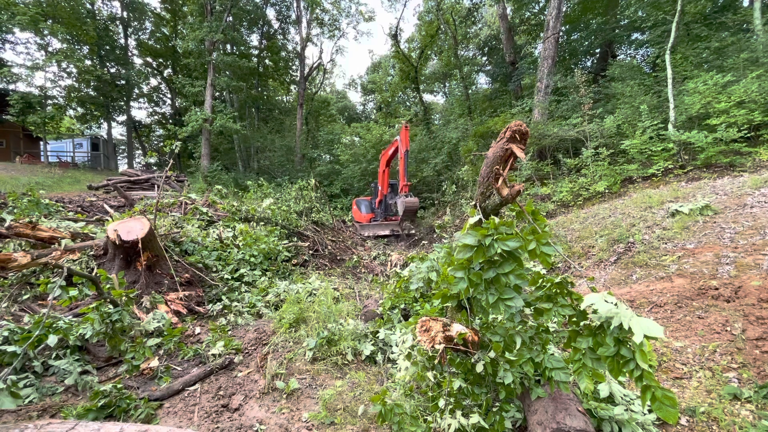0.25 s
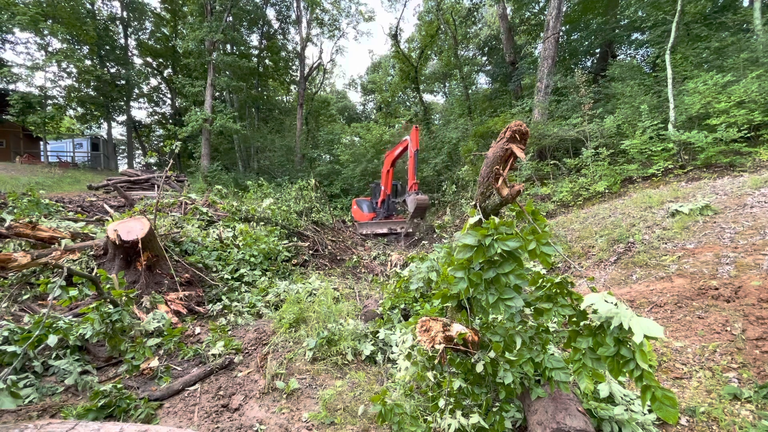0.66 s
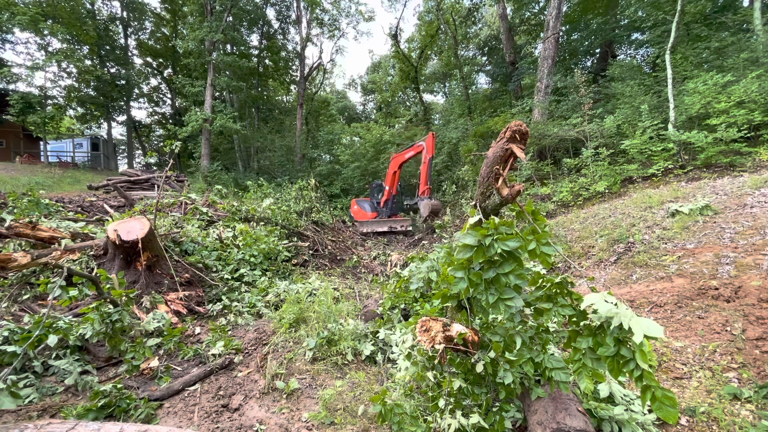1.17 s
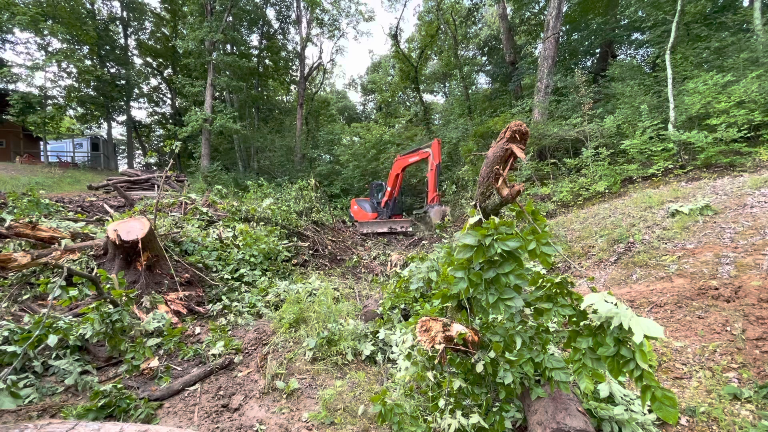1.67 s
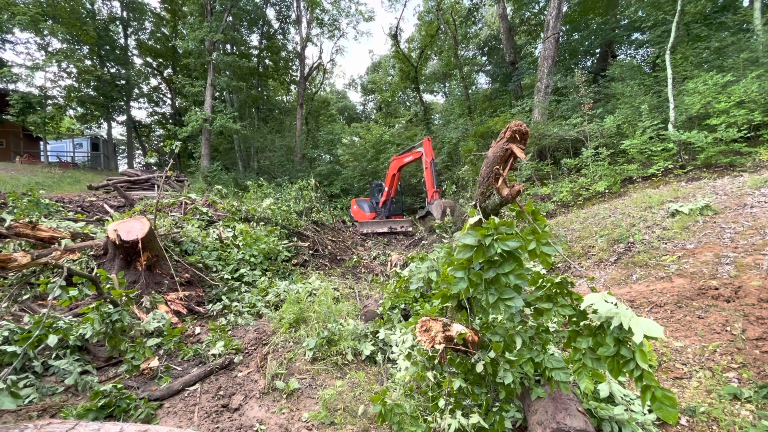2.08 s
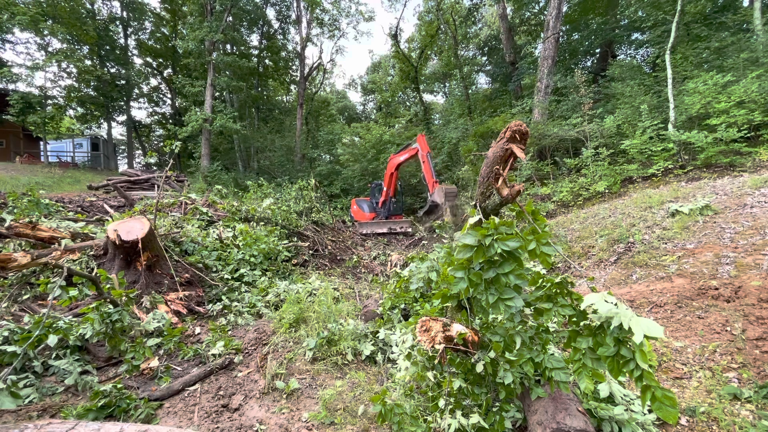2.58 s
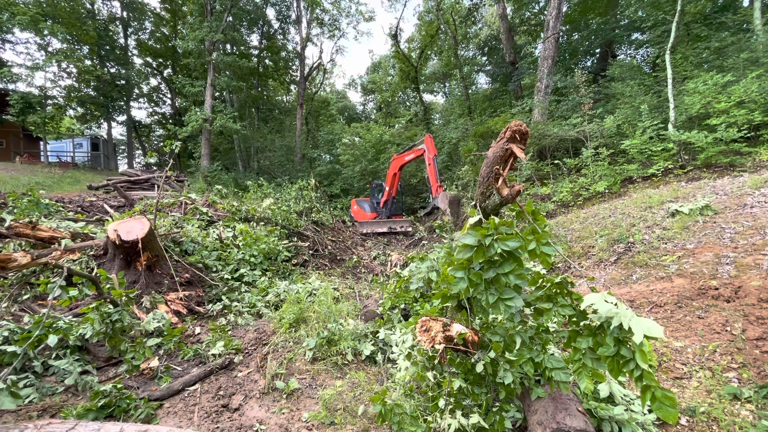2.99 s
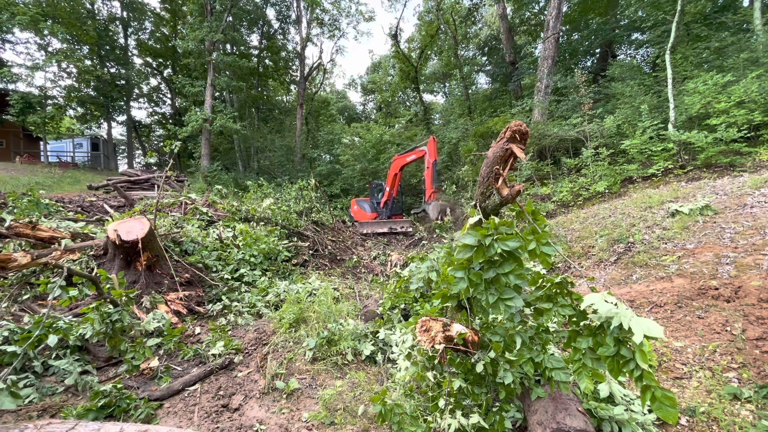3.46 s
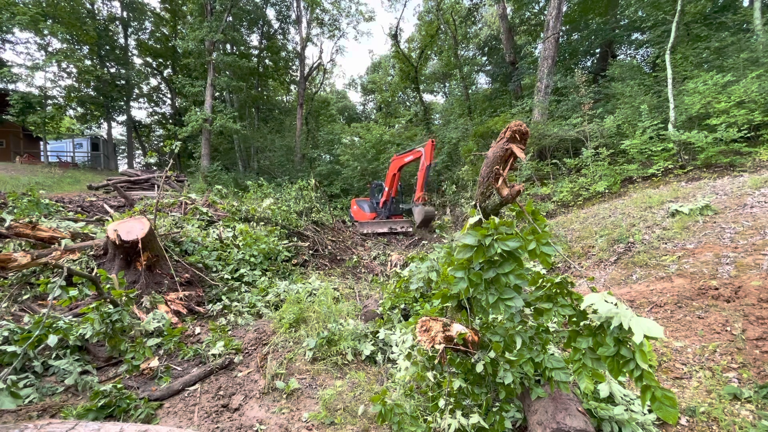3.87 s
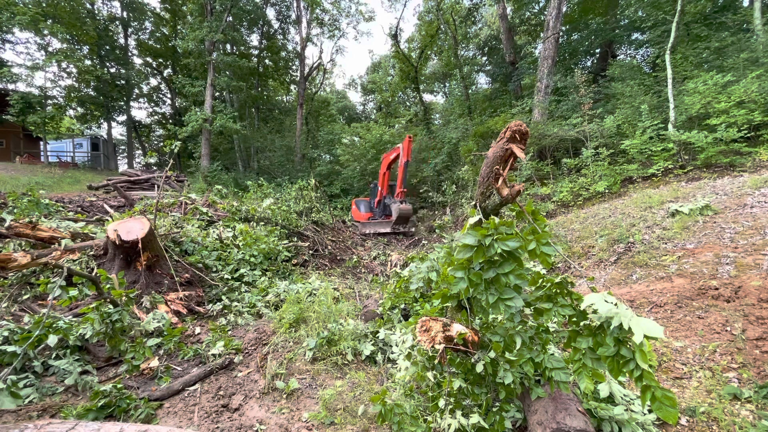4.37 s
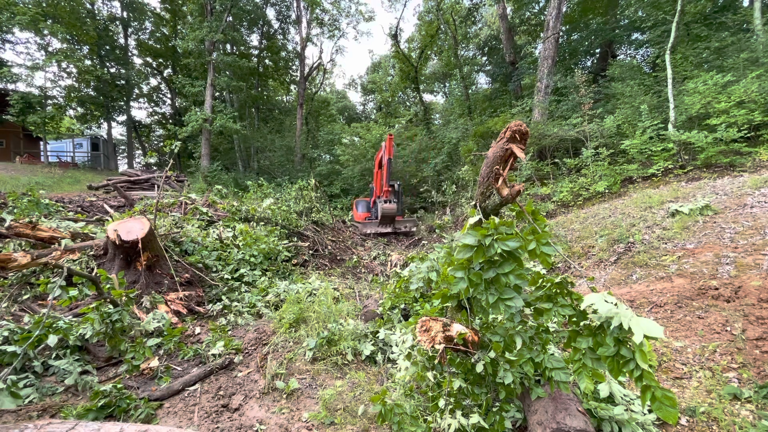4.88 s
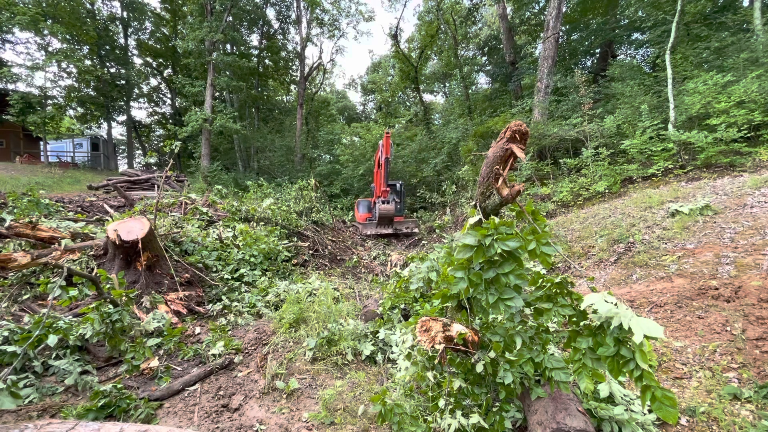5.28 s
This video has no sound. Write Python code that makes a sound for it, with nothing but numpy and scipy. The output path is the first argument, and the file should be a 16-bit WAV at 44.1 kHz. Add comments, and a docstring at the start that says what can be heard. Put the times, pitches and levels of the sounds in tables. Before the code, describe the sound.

Repeated short metal clanks and thuds sound over the steady diesel drone of a small excavator working outdoors among felled trees.

```python
"""A diesel exhaust hums over a low rumble: a small excavator works among felled trees some way off.
The hum is a few multiples of the firing rate, sagging under load; engine and tracks roar beneath it.
Tracks and bucket clank on stones, each blow a short grind that rings steel and thuds into the soil.
Close by, leaves hiss and dry twigs snap; past halfway the hydraulics whine faintly.
Trunks and slope scatter the clanks and snaps into a short tail."""
import sys
import numpy as np
from scipy import signal
from scipy.fft import rfft, irfft
from scipy.io import wavfile
from scipy.ndimage import uniform_filter1d

SR = 44100
rng = np.random.default_rng(int(sys.argv[2]) if len(sys.argv) > 2 else 0)


def dump_mix(stems):
    """Bounce the given channels to the path in sys.argv[1] as a 16-bit WAV at rate SR."""
    frames = np.atleast_2d(stems).T  # one column per channel
    limited = np.clip(frames, -1, 1)  # hard clip at full scale
    pcm = np.round(limited * 32767).astype(np.int16)
    wavfile.write(sys.argv[1], SR, pcm)


N = 244314
TIME = np.arange(N) / SR

# engine speed, sagging under load: t/s, firing rate/Hz
FIRING_RATE = [(0, 68.5), (.55, 68.2), (1.0, 69.0), (1.4, 70.4), (1.7, 69.7), (2.2, 68.5), (2.7, 69.0),
               (3.5, 68.6), (3.9, 67.4), (4.7, 67.6), (5.54, 68.0)]
# exhaust tones, low hum and pipe: multiple of the firing rate, base level/dB, waver/dB
HUM_TONES = [(1, -36, 1), (2, -33.5, 2.5), (3, -51, -1)]
PIPE_TONES = [(5, -43.5, 3.5), (6, -59.5, 2.4)]
# exhaust tones coming and going: t/s, hum gain/dB, pipe gain/dB
EXHAUST_SWELLS = [(0, 2.5, 1), (.25, -7, -3), (.45, -1, -1), (.75, -1.5, -12), (1.25, -8.5, -4),
                  (1.45, 0, -3), (1.57, -8, 11), (1.7, -5.5, 0), (1.82, -0.5, 4), (1.95, -1.5, -0.5),
                  (2.15, -2.5, 6), (2.6, -0.5, 0.5), (3.0, -6.5, 2), (3.3, -3, 0), (3.7, -1.5, -4.5),
                  (3.8, 1, 8.5), (3.9, 1, 14.5), (4.0, -1, -2), (4.1, -5, -1), (4.35, -1.5, -28),
                  (4.7, -4, 2), (5.3, -4.5, 6), (5.54, 2, 3)]
# levels of the machine's roar and drone, and of an unevenly drifting low rumble:
# t/s, roar level/dB, drone level/dB, rumble level/dB
BED_LEVELS = [(0, -36.5, -31.5, -37), (.26, -33, -32.5, -36), (.66, -37.5, -36.5, -39),
              (1.05, -36.5, -35.5, -32.5), (1.25, -44.5, -52, -38.5), (1.6, -38.5, -39.5, -38),
              (1.8, -33, -36, -42), (1.95, -41, -45, -37), (2.3, -40, -39, -38), (2.75, -42.5, -41, -37),
              (3.0, -40.5, -36, -37.5), (3.35, -42.5, -49, -37), (3.7, -37, -35.5, -41),
              (4.0, -39, -48, -34.5), (4.3, -35, -36, -33.5), (4.55, -36, -34.5, -32.5),
              (4.8, -39.5, -32.5, -38.5), (5.2, -34, -33, -30), (5.54, -35, -37, -31)]
# tone colours of low rumble, chassis, engine with tracks, and leaves: f/Hz, relative level/dB
RUMBLE_COLOUR = [(25, -28), (48, 3), (62, -6), (95, 4.5), (120, 1.5), (160, -19), (300, -64)]
DRONE_COLOUR = [(70, -4.5), (120, 2), (160, 2.5), (200, -3.5), (260, -12.5), (330, -6.5), (600, -64)]
ROAR_COLOUR = [(120, -40), (240, -7), (350, 3.5), (500, -2), (680, -6), (1100, -10), (1350, -11.5),
               (1550, -27), (1900, -16), (2600, -23), (4000, -34.5), (6500, -46)]
LEAF_COLOUR = [(2000, 4.5), (4000, -1.5), (5400, -0.5), (6500, -2.5), (8500, -2), (10000, 0.5),
               (11200, 3.5), (11900, -3), (12400, -12), (12800, -41)]
# steady part of the leaf hiss: t/s, level/dB
LEAF_LEVELS = [(0, -48.5), (.2, -51.5), (1.0, -47.5), (2.3, -49), (3.3, -48.5), (4.1, -47), (4.7, -48.5),
               (5.54, -52.5)]
# modes of bucket and tracks: f/Hz, relative level/dB, t60/s (held within RING_LIMITS_S)
STEEL_MODES = [(840, 0.5, 0.0085), (886, -21, 0.033), (1035, 9, 0.013), (1125, 10, 0.039),
               (1283, 7.5, 0.065), (1308, 7, 0.073), (1700, -13, 0.054), (1803, 12, 0.0047),
               (1780, -19, 0.024), (2049, 7, 0.048), (2160, -15, 0.012), (2620, -19, .018),
               (2780, 7, 0.032), (3140, 22, 0.03), (3500, -32, 0.018), (4430, -29, 0.017)]
# blows on stone: t/s, crunch level/dB, ring f/Hz, ring level/dB, thud f/Hz, thud level/dB,
# edge f/Hz, edge level/dB, base grind time/ms
BLOWS = [(0.045, -41, 900, -37, 440, -31, 2500, -55, 12),
         (0.058, -34.5, 820, -31.5, 455, -25, 3070, -45, 20),
         (0.159, -33, 1050, -45, 174, -31.5, 3000, -63, 61),
         (0.194, -52, 930, -29, 207, -26, 3000, -64, 31),
         (0.271, -35, 1790, -28, 190, -49, 2760, -34.5, 12),
         (0.354, -22, 1050, -39, 460, -27.5, 4340, -36.5, 18),
         (0.428, -37.5, 1110, -51, 380, -32, 5000, -49, 19),
         (0.567, -39, 840, -37, 450, -25, 2000, -50, 11.3), (0.63, -43, 1000, -46, 450, -45, 2500, -52, 15),
         (0.655, -40, 1090, -42, 480, -37, 2500, -52, 15),
         (0.672, -33.5, 914, -42, 477, -33.5, 3000, -51, 13),
         (0.802, -35.5, 1240, -41, 180, -51, 3000, -58, 8.7),
         (0.918, -28.5, 1240, -34, 420, -27, 3420, -36, 10),
         (0.938, -36, 1200, -27.5, 546, -27, 3470, -53, 9.5),
         (1.033, -38, 1935, -38.5, 180, -47, 3500, -44, 15.6),
         (1.422, -35, 1220, -36.5, 402, -26, 3000, -63, 19),
         (1.616, -27.5, 1280, -37, 660, -45, 3700, -38, 21.3),
         (1.663, -28.5, 1205, -25, 198.1, -27.5, 2960, -55, 10),
         (1.740, -28, 880, -39, 368, -22.5, 3240, -34, 19),
         (1.853, -61, 1367, -32.5, 360, -31, 3000, -61, 16),
         (1.881, -70, 1250, -34, 183, -29, 3000, -60, 14),
         (1.908, -49, 1192, -39.5, 182, -34.5, 3000, -55, 28),
         (2.185, -45, 1250, -28.5, 535, -32.5, 2600, -33, 10.5),
         (2.5, -46, 1250, -43, 440, -38, 2900, -53, 62), (2.204, -40, 1260, -40, 540, -51, 2520, -49, 7.8),
         (2.384, -50, 1040, -39, 444, -29, 2300, -55, 52),
         (2.445, -33, 1340, -19, 527, -36, 2930, -34, 7.7),
         (2.456, -30.5, 790, -29, 377, -21.5, 2100, -53, 9.8),
         (2.521, -44, 1200, -46, 503, -34.5, 3000, -58, 31),
         (2.664, -53, 1150, -44, 420, -37, 3000, -69, 15),
         (2.714, -53, 1320, -39.5, 370, -27.5, 3000, -69, 23),
         (2.754, -60, 870, -50, 405, -31, 3000, -67, 10), (2.836, -67, 1086, -44, 380, -33, 3000, -67, 29),
         (2.885, -60, 880, -43, 340, -32.5, 2980, -65, 13), (2.96, -64, 870, -58, 368, -34, 3000, -67, 18),
         (2.988, -35.5, 960, -35, 401, -31, 3540, -44, 13),
         (3.424, -36, 3550, -43, 378, -36, 4240, -45.5, 24),
         (3.555, -29.5, 836, -29, 390, -26.5, 3870, -36, 17.4),
         (3.703, -56, 1930, -57, 366, -30, 3050, -57, 5.3),
         (3.766, -22.5, 1340, -26.5, 565, -24.5, 3160, -25, 12.5),
         (3.786, -52, 867, -24, 444, -21, 3000, -54, 5.9),
         (3.858, -43, 1110, -49, 340, -33.5, 3000, -45, 15),
         (4.012, -29, 2050, -38, 646, -25.5, 3830, -35.5, 13),
         (4.123, -42, 796, -31.5, 503, -24, 2980, -60, 11.3),
         (4.175, -74, 1103, -34, 510, -32.5, 3000, -70, 12),
         (4.233, -31.5, 1092, -58, 371, -27.5, 3370, -47, 22),
         (4.268, -30.5, 955, -23.5, 420, -20.5, 3000, -65, 19.6),
         (4.347, -34.5, 751, -51, 562, -34, 3430, -41, 18),
         (4.411, -19.5, 1670, -19.5, 485, -17, 3700, -27.5, 10.7),
         (4.42, -26, 1320, -27, 420, -17.5, 3000, -32, 13),
         (4.431, -25.5, 1140, -27, 200, -18.5, 2500, -42, 25),
         (4.579, -30, 2300, -41, 420, -27.5, 2980, -44, 22),
         (4.588, -32, 1500, -34, 400, -32, 3500, -42, 23),
         (4.597, -28, 1810, -44, 388, -24.5, 4300, -36.5, 15.5),
         (4.734, -30.5, 2120, -42, 325, -29, 3000, -51, 25),
         (4.898, -33, 1977, -34.5, 260, -33, 3020, -66, 13),
         (5.035, -30, 1802, -35, 464, -28, 3260, -40.5, 8.2),
         (5.043, -29, 1232, -32, 123, -21, 3230, -48, 17),
         (5.216, -33.5, 961, -31.5, 338, -36, 3000, -62, 24),
         (5.272, -38.5, 1197, -36, 610, -43, 3000, -63, 100),
         (5.346, -55, 1205, -32, 177, -31, 3000, -66, 160),
         (5.388, -37, 1960, -36, 330, -30.5, 3000, -67, 20),
         (5.426, -35, 1020, -45, 327, -43, 3040, -49, 41), (5.499, -31, 1154, -31, 487, -39, 3020, -45, 20)]
# thud of frame and soil: f/Hz, width/Hz, relative level/dB
EARTH_MODES = [(120, 14, 4), (221, 68, 12.5), (417, 112, 12), (548, 55, 3)]
# breaking twigs: t/s, upper band level/dB, lower band level/dB, crackle time/ms
TWIG_SNAPS = [(0.355, -49, -41, 16), (0.415, -45, -53.5, 6.7), (0.4497, -48, -43, 9.9),
              (0.7626, -40, -47, 7.5), (1.046, -47, -43.5, 35), (1.1006, -38, -41, 12),
              (1.5015, -29, -28.5, 4.8), (1.575, -43, -53, 36), (1.623, -33, -36, 7.8),
              (1.67, -50, -43, 40), (1.9639, -47.5, -52, 9.0), (3.412, -42.5, -70, 18),
              (3.567, -28, -32, 15), (3.6206, -28.5, -36.5, 16), (3.673, -37, -31.5, 6.6),
              (3.685, -37, -41, 20), (3.765, -51, -37, 18), (3.954, -46, -45, 47), (4.41, -47, -35.5, 20)]
# narrow hums and hisses: start t/s (silent if past the scene's end), end t/s, f/Hz, width/Hz, level/dB
NARROW_SWELLS = [(0.37, .95, 157, 9.6, -35), (3.512, 3.841, 51, 6.8, -46), (7.3, 5.439, 89, 21, -36),
                 (5.435, 5.58, 95, 11, -26), (2.726, 2.977, 7450, 550, -58.5),
                 (3.081, 3.382, 1810, 95, -54.5)]
# whine of the hydraulic pump: t/s, f/Hz, level/dB
PUMP_WHINE = [(3.5, 465, -66), (3.7, 487, -47.5), (4.0, 504, -43.5), (4.3, 518.4, -75), (4.7, 532, -52.5),
              (5.1, 539, -49), (5.54, 529, -60)]
# echo tail of the woods: f/Hz, t60/s
WOODS_DECAY = [(200, .15), (1500, .35), (4000, .34), (8000, .47)]
# pair of microphone ports: f/Hz, likeness, left lead/rad, left minus right/dB
PORT_IMAGE = [(60, .995, 0, .1), (170, .985, 0, .1), (340, .93, .02, .1), (700, .6, -.2, .4),
              (1050, .63, .05, 2.1), (1400, .64, -.5, 1.2), (2100, .78, -.05, 1.4), (2800, .66, .6, 1.6),
              (4500, .6, .43, 3.2), (5300, .22, -.4, 4.4), (6400, .52, .5, 4.1), (7300, .55, -.2, 2.9),
              (8100, .2, .3, .4), (8650, .5, .6, .3), (9300, .75, -1.9, .2), (9650, .93, -2.8, .1),
              (9990, .995, -3.12, .1), (10350, .995, -3.17, .1), (10680, .92, -3.7, .6),
              (11000, .87, -4.3, .6), (11700, .92, -5.95, .2), (12100, .95, -6.36, .1),
              (12500, .85, -6.6, .1), (12900, .6, -6.9, .1)]

RING_LIMITS_S = (.01, .026)  # shortest and longest ring of the damped steel
STEEL_DETUNE, EARTH_DETUNE = (-.0384, .03), (-.0972, .09)  # each blow shifts the modes by these shares
SHAKE_DB, SHAKE_S = -17.5, .2  # leaves after a snap: level relative to the snap, decay time of the power


def amp(db):
    return 10 ** (np.asarray(db) / 20)


def unit_rms(x):
    return x / np.sqrt(np.mean(x ** 2) + 1e-20)


def at_hz(table, hz, column=1):
    columns = np.transpose(table)
    return np.interp(np.log(hz + 1), np.log(columns[0] + 1), columns[column])


def automation(table, column=1):
    columns = np.transpose(table)
    return np.interp(TIME, columns[0], columns[column])


def wander(top_hz):
    """Slow random modulation, rms 1."""
    rates = np.geomspace(top_hz / 12, top_hz, 16)
    return unit_rms(sum(np.sin(2 * np.pi * (f * TIME + rng.random())) / np.sqrt(f) for f in rates))


def noise(colour, patchy_db, size):
    """Two unrelated coloured noises that share drifting louder and softer patches."""
    frames, hz = 4 * N // size + 5, np.fft.rfftfreq(size, 1 / SR)
    a, b, c, d, patches = rng.standard_normal((frames, len(hz), 5)).T
    patches = uniform_filter1d(patches, size // 100, axis=0)
    patches = unit_rms(uniform_filter1d(patches, 4096 // size + 2, axis=1))
    spectra = np.array([a + 1j * b, c + 1j * d]) * amp(at_hz(colour, hz)[:, None] + patchy_db * patches)
    return unit_rms(signal.istft(spectra, nperseg=size, noverlap=size - size // 4)[1][:, :N])


def band(x, lo_hz, hi_hz):
    return signal.sosfilt(signal.butter(2, [lo_hz, hi_hz], "band", fs=SR, output="sos"), x)


def ring(x, hz, width_hz):
    """A two-pole resonance, gain 1 at its centre."""
    r = np.exp(-np.pi * width_hz / SR)
    poles = [1, -2 * r * np.cos(2 * np.pi * hz / SR), r * r]
    return signal.lfilter([1, 0, -1], poles, x) * (1 - r * r) / 2


def focus(x, hz, width_hz):
    """The same resonance twice, for steeper skirts."""
    return ring(ring(x, hz, width_hz), hz, width_hz)


def burst(decay_ms, rise_ms, grit_db):
    """A flurry of small impacts: grainy noise that rises, holds briefly and dies."""
    ms = np.arange(6000) / SR * 1000
    left, right, grain = rng.standard_normal((6000, 3)).T
    grain = amp(grit_db * unit_rms(uniform_filter1d(grain, 90)))
    envelope = (1 - np.exp(-ms / rise_ms)) * np.exp(-(ms / max(decay_ms, 2)) ** 1.5)
    return np.array([left, right]) * grain * envelope


def peak_at(x, db):
    """Sets the loudest 4 ms of each channel to a level."""
    return x * amp(db) / np.sqrt(uniform_filter1d(x ** 2, 180).max(1, keepdims=True))


def add(mix, start_s, sound):
    part = mix[:, round(start_s * SR):][:, :sound.shape[1]]
    part += sound[:, :part.shape[1]]


def engine_firings():
    """Running count of firings; the engine hunts slightly around its speed."""
    hunting = 1 + .004 * wander(9)
    return np.cumsum(automation(FIRING_RATE) * hunting) / SR


def exhaust(firings):
    """Low multiples of the firing rate, each wavering in level and phase as echoes shift."""
    def tone(multiple, db, waver_db, drift_turns):
        phase = multiple * firings + drift_turns * wander(14)
        return amp(db + waver_db * wander(26)) * np.cos(2 * np.pi * (phase + rng.random()))

    hum = amp(automation(EXHAUST_SWELLS, 1)) * sum(tone(*row, drift_turns=.048) for row in HUM_TONES)
    pipe = amp(automation(EXHAUST_SWELLS, 2)) * sum(tone(*row, drift_turns=.12) for row in PIPE_TONES)
    return np.sqrt(2) * (hum + pipe)


def low_rumble():
    """A low rumble whose level drifts unevenly."""
    return amp(automation(BED_LEVELS, 3)) * noise(RUMBLE_COLOUR, patchy_db=1.3, size=2048)


def machine_noise(firings):
    """The chassis drones, and each firing lightly puffs the roar of engine and tracks."""
    drone = amp(automation(BED_LEVELS, 2)) * noise(DRONE_COLOUR, patchy_db=2.4, size=2048)
    puffs = 1 + .019 * np.cos(2 * np.pi * firings)
    roar_gain = amp(automation(BED_LEVELS, 1) + .34 * wander(30)) * puffs
    return drone + roar_gain * noise(ROAR_COLOUR, patchy_db=.96, size=512)


def leaves():
    """Leaves hiss with a light flutter and go on shaking after each snap."""
    shake_power = sum(amp(db + SHAKE_DB) ** 2 * (TIME > t) * np.exp(-abs(TIME - t) / SHAKE_S)
                      for t, db, *_ in TWIG_SNAPS)
    shake_power = uniform_filter1d(shake_power, 1500, origin=700)
    gain = np.sqrt(amp(automation(LEAF_LEVELS)) ** 2 + shake_power)
    flutter = amp(1.65 * wander(25))
    return gain * flutter * noise(LEAF_COLOUR, patchy_db=.16, size=512)


def steel(blow, hz, reach_octaves):
    """Struck steel, dulled by distance; the modes within reach of hz are favoured."""
    dull = band(blow, 250, 3400)
    ringing = 0
    for f, db, t60 in STEEL_MODES:
        gain = amp(db) * np.exp(-abs(np.log2(f / hz)) / reach_octaves)
        width_hz = 1.86 / np.clip(t60, *RING_LIMITS_S)
        ringing += gain * ring(dull, f * (1 + rng.uniform(*STEEL_DETUNE)), width_hz)
    return ringing


def rattle(ticks_per_s=55):
    """Loose stones and links tick the steel at random, louder as the roar rises."""
    impacts = amp(5.2 * np.minimum(rng.exponential(1, N), 3)) * (rng.random(N) < ticks_per_s / SR)
    grit = uniform_filter1d(impacts, 260) * rng.standard_normal((N, 2)).T
    ticks = unit_rms(steel(grit, 935, reach_octaves=.037)) + 1.1 * unit_rms(band(grit, 160, 650))
    return amp(automation(BED_LEVELS, 1) - 14) * ticks


def earth_thud(push, hollow_hz):
    """Frame and soil answer a blow with broad low modes and one hollow pitch."""
    body = sum(amp(db) * ring(push, f * (1 + rng.uniform(*EARTH_DETUNE)), width)
               for f, width, db in EARTH_MODES)
    return body + amp(19) * focus(push, hollow_hz, width_hz=70)


def clanks():
    """Steel grinds briefly on stone: a broad crunch, a narrow ring, a hollow thud and a bright edge."""
    mix = np.zeros((2, N))
    for t, crunch_db, ring_hz, ring_db, thud_hz, thud_db, edge_hz, edge_db, grind_ms in BLOWS:
        rise_ms = max(.055 * grind_ms, .3)  # a long grind has a softer attack
        grind = burst(1.4 * grind_ms, 2.9 * rise_ms, grit_db=4.7)
        crunch = .5 * unit_rms(steel(grind, 890, reach_octaves=.75))
        crunch += .33 * unit_rms(band(grind, 500, 2280))
        strike = burst(.81 * grind_ms, .92 + rise_ms, grit_db=4.1)
        ringing = steel(strike, ring_hz, reach_octaves=.022)
        push = burst(.98 * grind_ms, 1.5 + rise_ms, grit_db=1)
        thud = earth_thud(band(push, 55, 1070), thud_hz)
        tick = burst(1.25 * grind_ms, 1.1 + rise_ms, grit_db=3.2)
        edge = unit_rms(band(band(tick, 1560, 6900), 1300, 6000))
        edge += 1.5 * unit_rms(focus(tick, edge_hz, .35 * edge_hz))
        for layer, db in (crunch, crunch_db), (ringing, ring_db), (thud, thud_db), (edge, edge_db):
            add(mix, t - .002, peak_at(layer, db))
    return mix


def twigs():
    """Dry twigs crack close by: thin, bright crackles."""
    mix = np.zeros((2, N))
    for t, upper_db, lower_db, ms in TWIG_SNAPS:
        crack = burst(ms, .27 + .08 * ms, grit_db=2.6)
        upper = band(band(crack, 8500, 12150), 7930, 11900)
        lower = band(crack, 5430, 10400)
        add(mix, t - .001, peak_at(upper, upper_db) + peak_at(lower, lower_db))
    return mix


def narrow_swells():
    """Hums and hisses swell and pass: noise in one narrow resonance, faded in and out."""
    mix = np.zeros((2, N))
    for start, end, hz, width, db in NARROW_SWELLS:
        length = round(max(end - start, .05) * SR)
        hum = unit_rms(focus(rng.standard_normal((SR, 2)).T, hz, width))[:, -length:]
        add(mix, start, amp(db) * hum * signal.windows.tukey(length, .6))
    return mix


def hydraulics():
    """The pump whines faintly: one wavering tone that glides mostly upward."""
    gain = amp(automation(PUMP_WHINE, 2) + 4.6 * wander(15)) * (TIME > PUMP_WHINE[0][0])
    turns = np.cumsum(automation(PUMP_WHINE, 1)) / SR
    return np.sqrt(2) * gain * np.cos(2 * np.pi * turns)


def woods(send):
    """Trunks and slope scatter the sound: sparse echoes of random sign, the lows dying first."""
    taps = np.zeros((2, SR // 2))
    delays = np.arange(300, SR // 2 - 20, 20) + rng.integers(0, 20, (2, (SR // 2 - 301) // 20))
    np.put_along_axis(taps, delays, rng.choice([-1., 1.], delays.shape), 1)
    hz, t, spectra = signal.stft(taps, SR, nperseg=256)
    decay = amp(-60 * t / at_hz(WOODS_DECAY, hz)[:, None])
    tail = signal.istft(spectra * decay, SR, nperseg=256)[1]
    return signal.fftconvolve(send, tail / np.linalg.norm(tail[0]), axes=1)[:, :N]


def stereo_ports(x):
    """The right port hears part of what the left hears and part of its own, shifted in phase."""
    hz = np.fft.rfftfreq(N, 1 / SR)
    likeness, lead, tilt_db = (at_hz(PORT_IMAGE, hz, column) for column in (1, 2, 3))
    left, own = rfft(x)
    right = (likeness * left + np.sqrt(1 - likeness ** 2) * own) * np.exp(-1j * lead)
    return irfft(np.array([left * amp(tilt_db / 2), right * amp(-tilt_db / 2)]), N)


def scene():
    """Machine and undergrowth together; only clanks, rattle and snaps feed the woods' echo."""
    firings = engine_firings()
    tones = exhaust(firings) + hydraulics()
    wide_tones = np.array([tones, signal.hilbert(tones).imag])  # channels a quarter turn apart
    hits, snaps = clanks() + rattle(), twigs()
    bed = low_rumble() + machine_noise(firings) + leaves() + narrow_swells()
    echoes = woods(amp(-8) * hits + amp(-7) * snaps)
    return stereo_ports(wide_tones + bed + hits + snaps + echoes)


def record(dry):
    """A low cut at 41 Hz and a steep high cut at 13050 Hz."""
    low_cut = signal.butter(6, 41, "high", fs=SR, output="sos")
    high_cut = signal.firwin(511, 13050, window=("kaiser", 9), fs=SR)
    return signal.oaconvolve(signal.sosfilt(low_cut, dry), high_cut[None], "same")


dry = scene()
out = record(dry)
dump_mix(out)
```